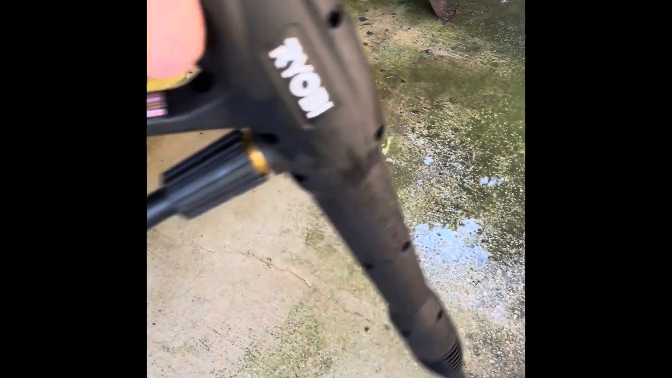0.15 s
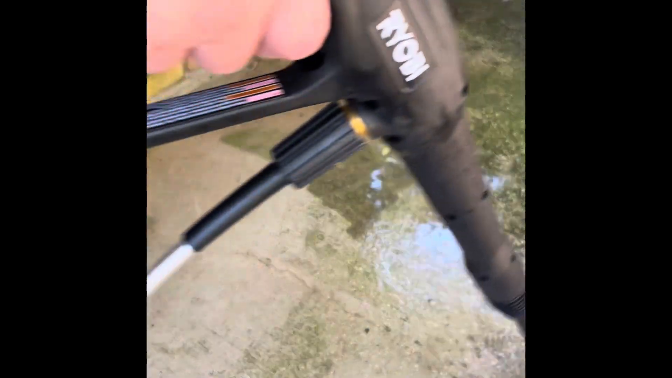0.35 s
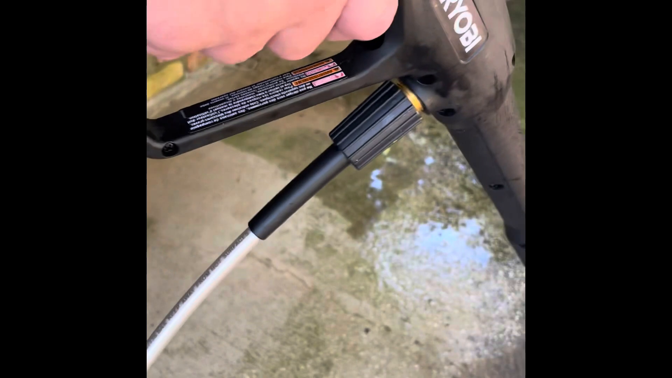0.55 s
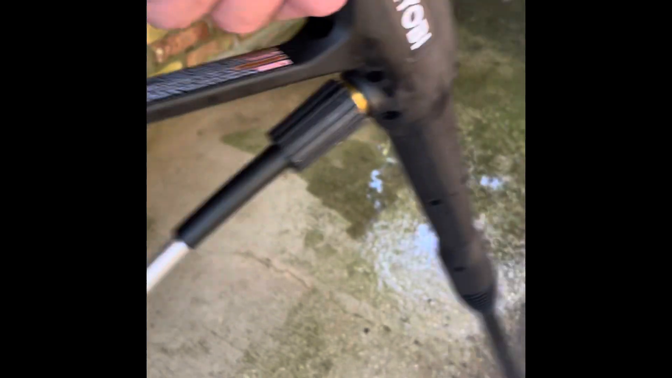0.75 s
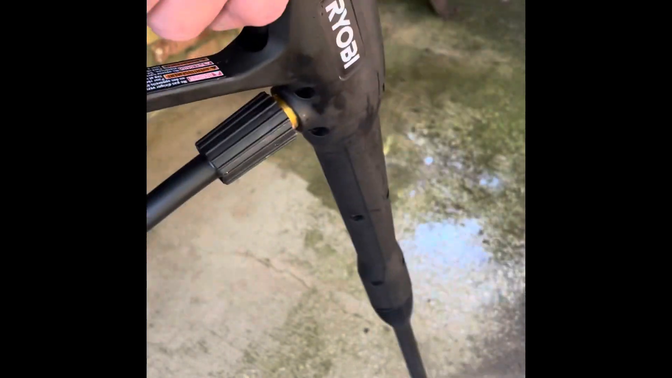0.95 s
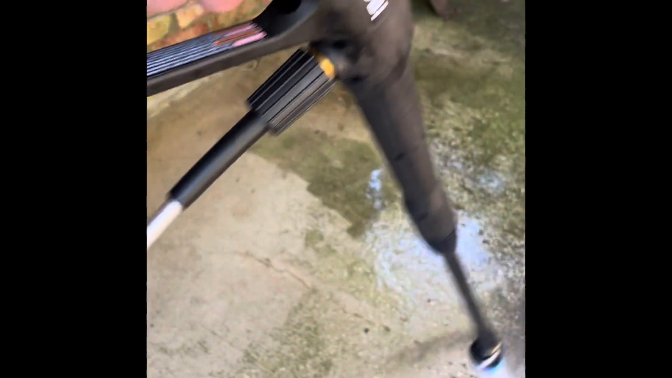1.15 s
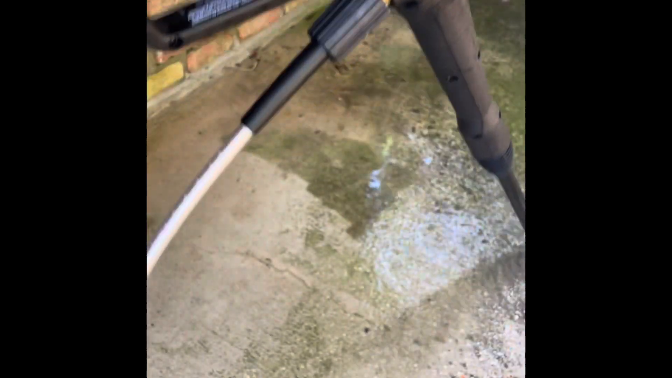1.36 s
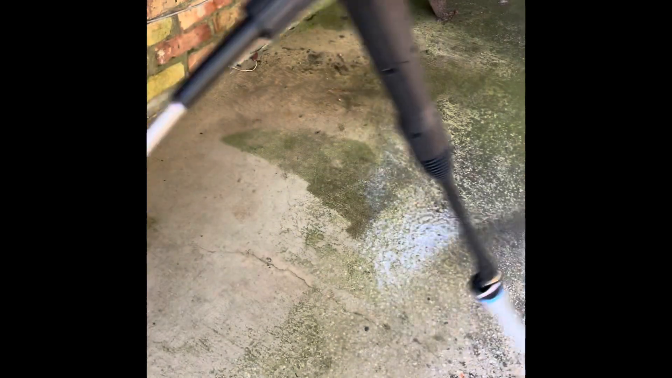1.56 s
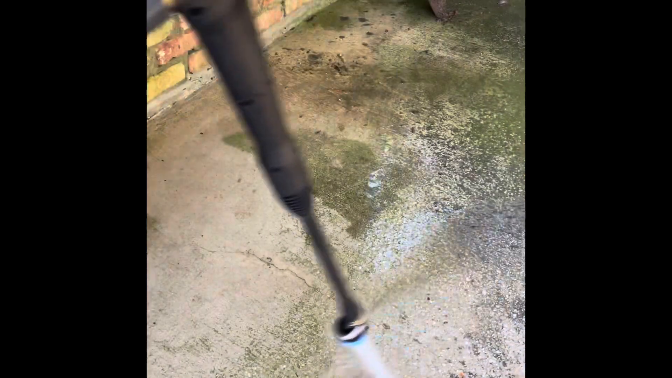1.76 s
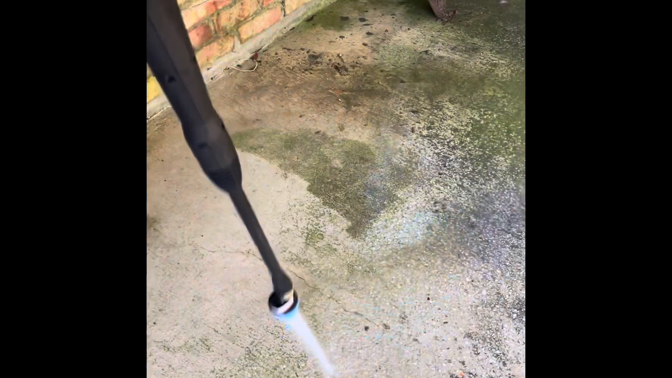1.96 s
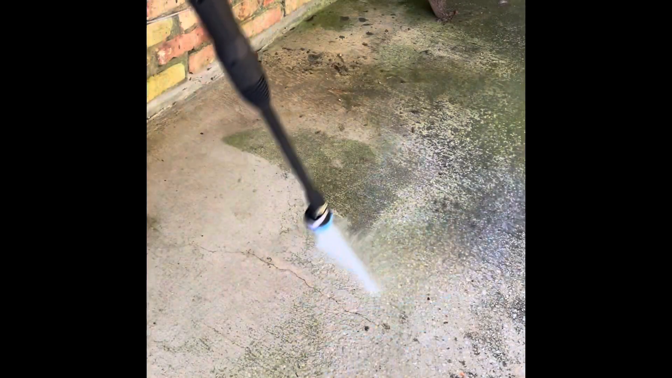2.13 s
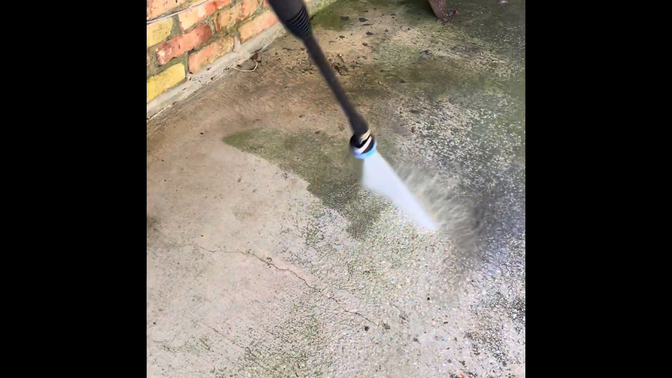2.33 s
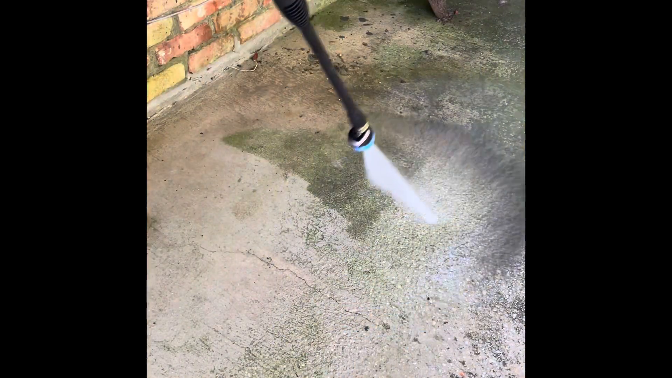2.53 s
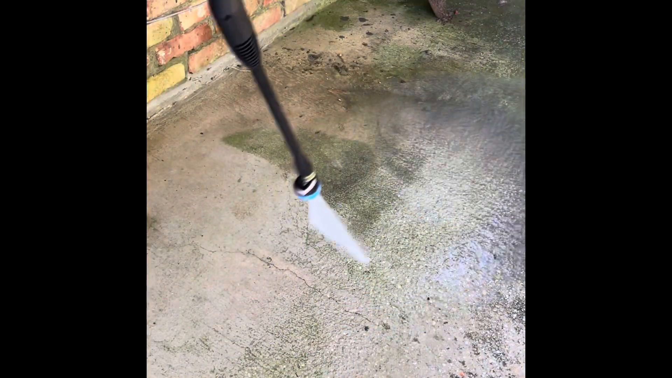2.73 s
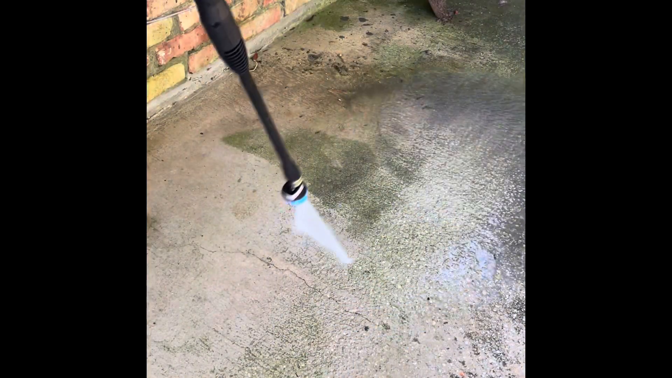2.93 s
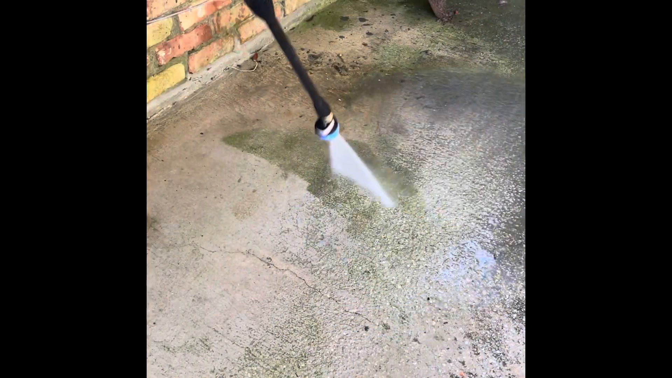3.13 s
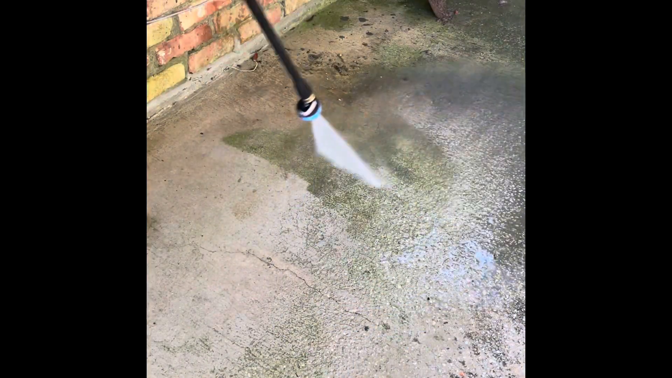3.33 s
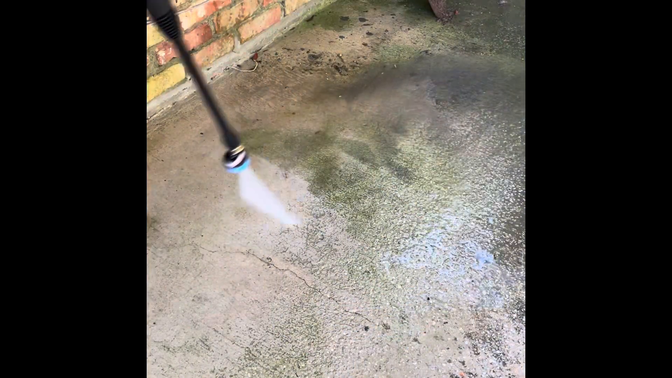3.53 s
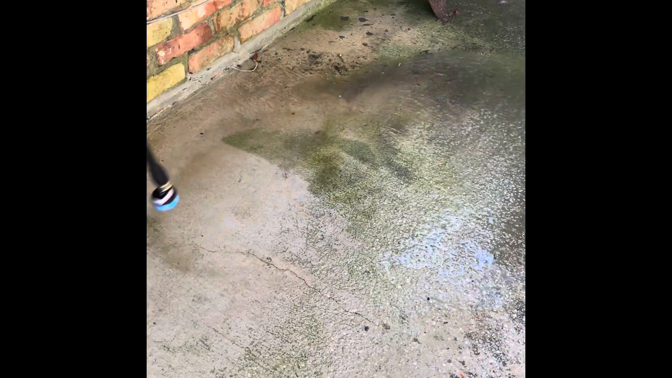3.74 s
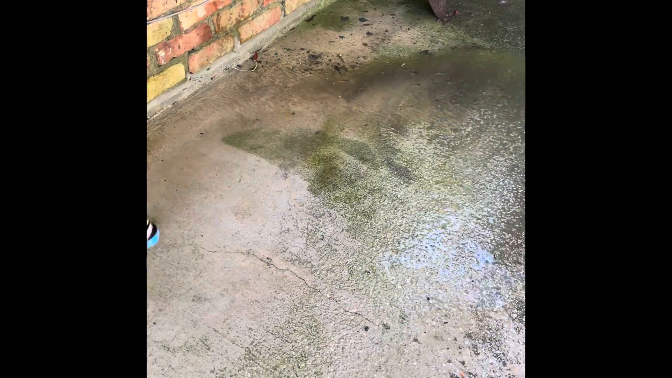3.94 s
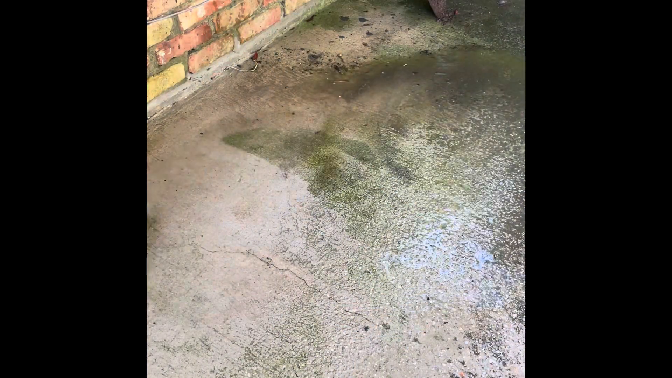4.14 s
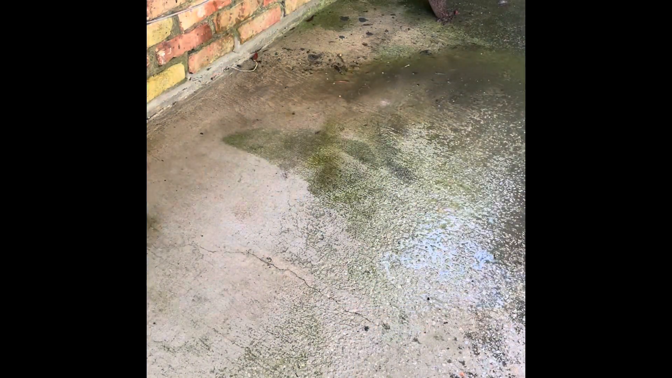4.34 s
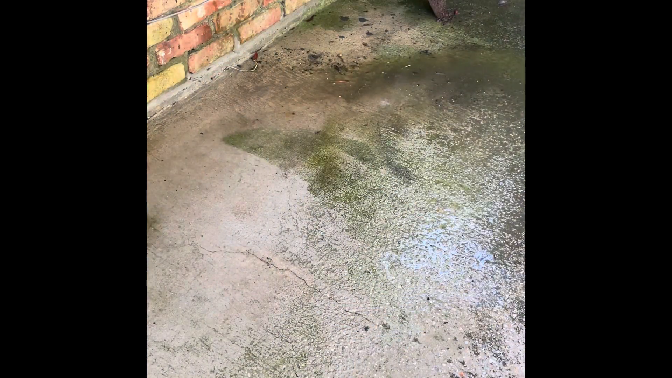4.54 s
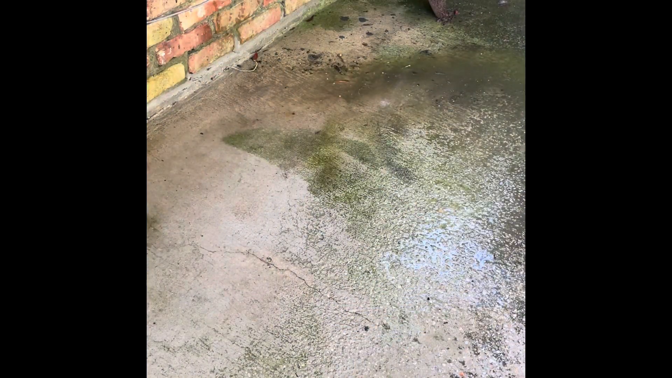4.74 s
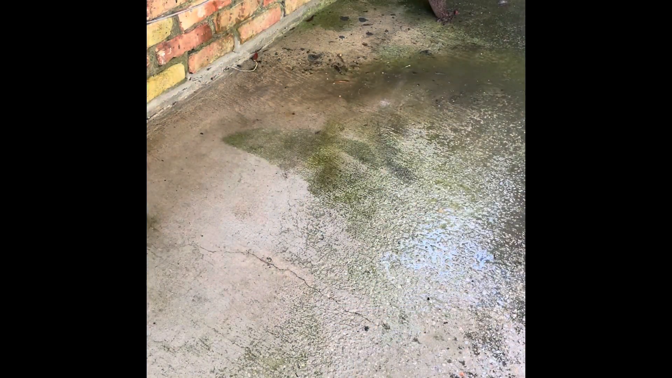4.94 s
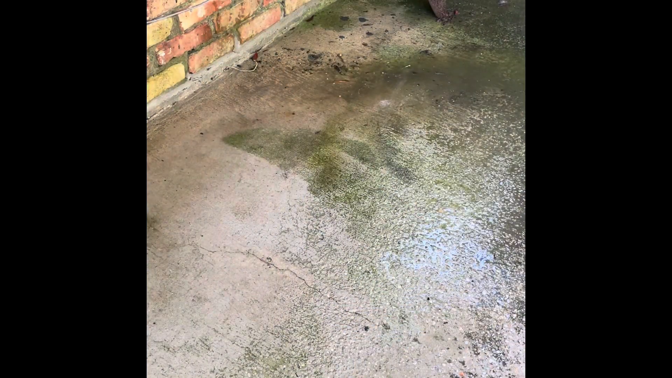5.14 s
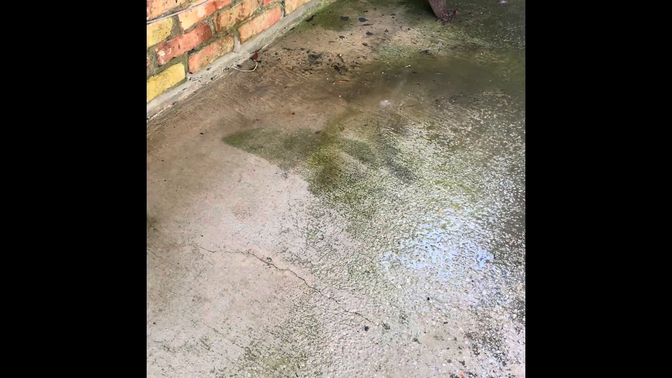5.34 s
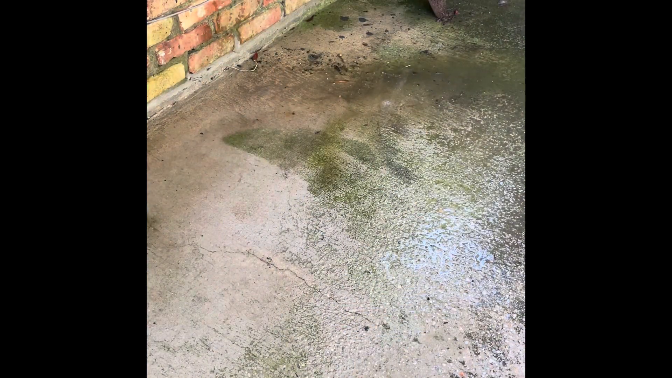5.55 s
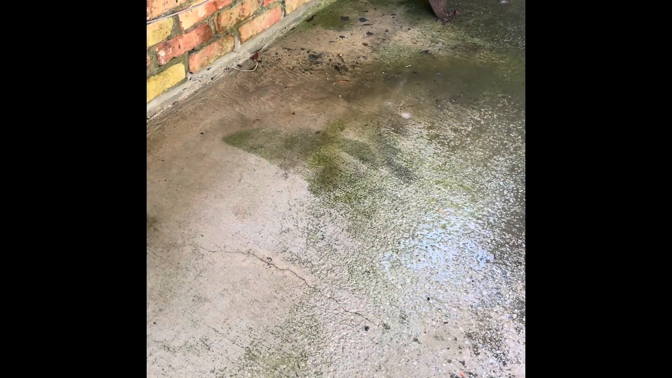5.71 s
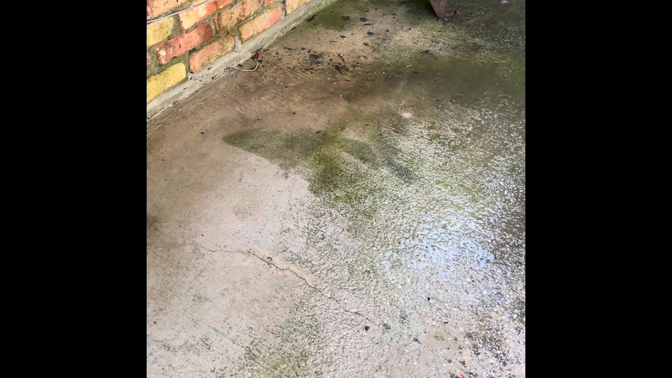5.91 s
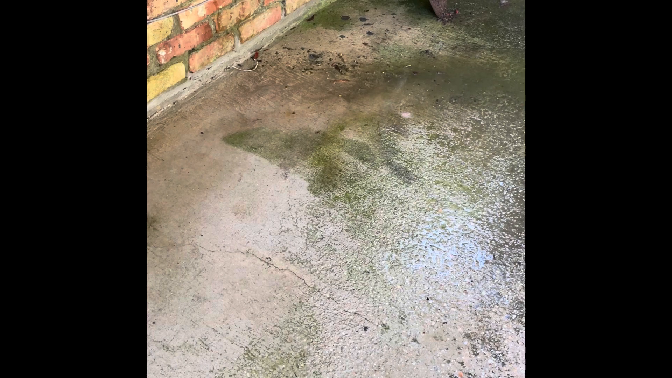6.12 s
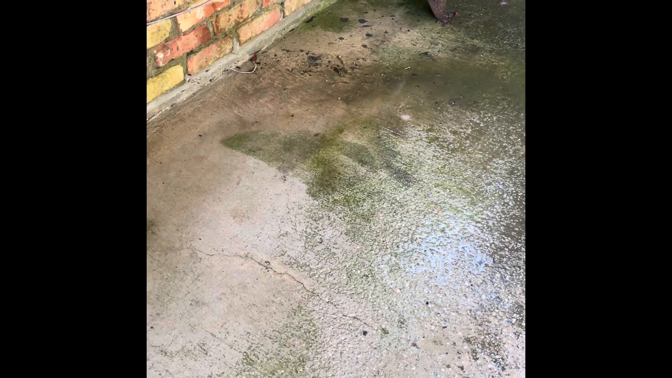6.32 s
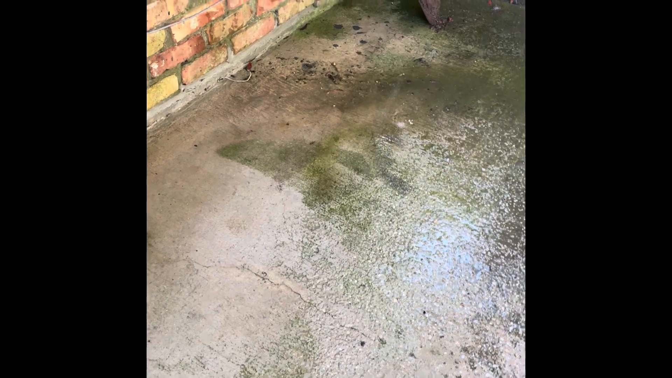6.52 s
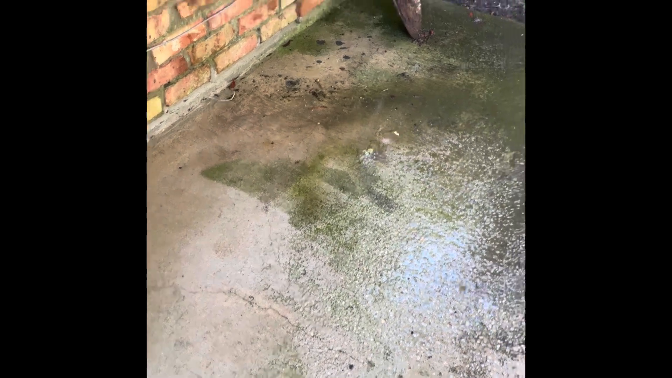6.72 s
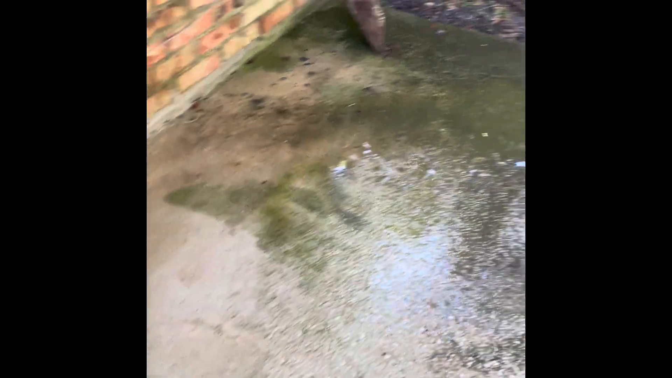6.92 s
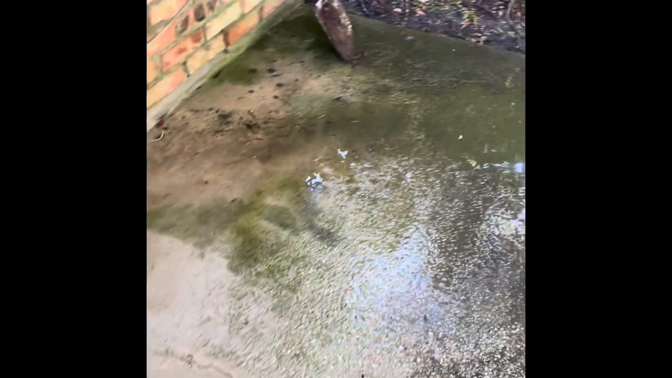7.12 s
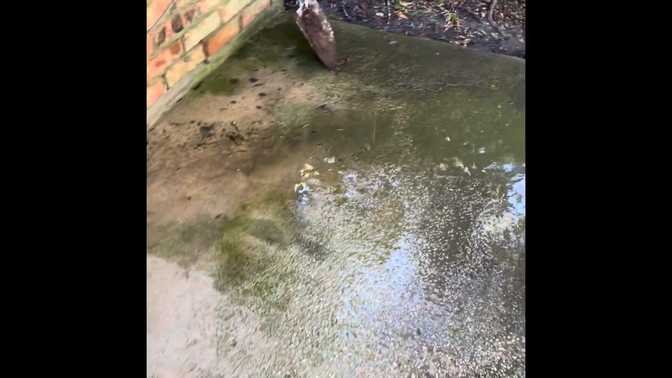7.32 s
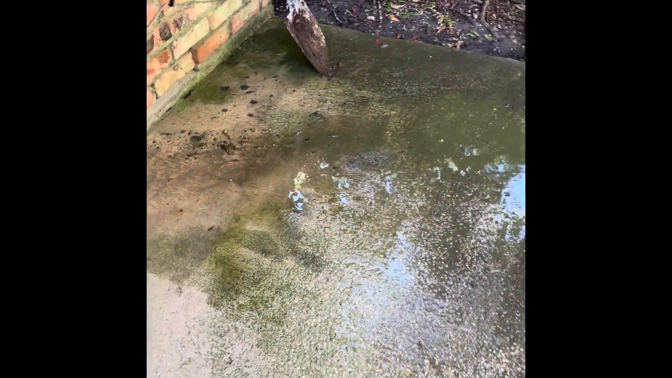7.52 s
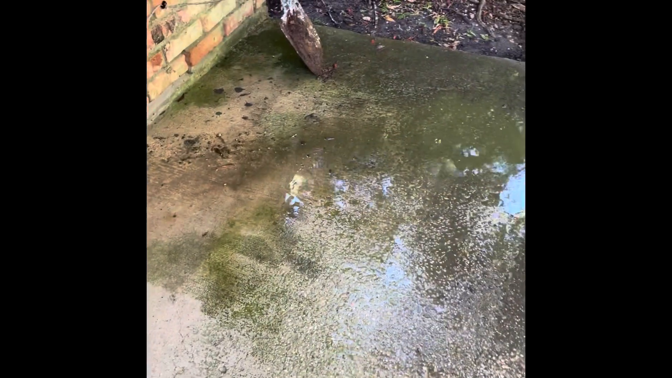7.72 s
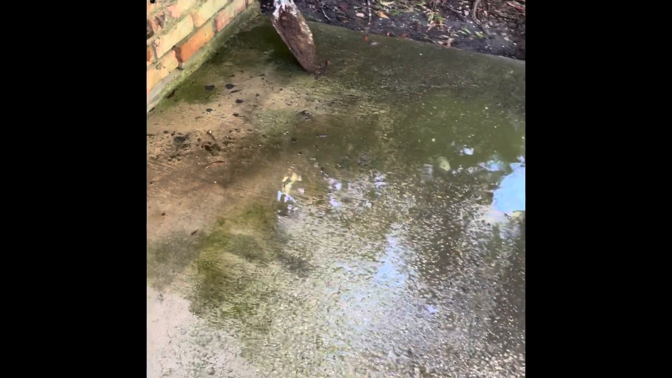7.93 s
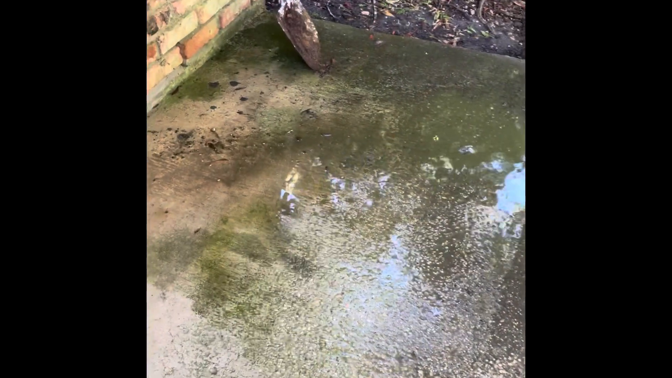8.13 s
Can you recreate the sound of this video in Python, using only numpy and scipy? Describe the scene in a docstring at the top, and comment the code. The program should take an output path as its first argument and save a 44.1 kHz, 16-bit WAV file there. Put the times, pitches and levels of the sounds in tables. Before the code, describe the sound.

Steady water hiss and a rough electric motor whirr fill the opening, with one hollow knock on the spray gun. The water shuts abruptly; the whine falls unevenly through plastic housing resonances and ends with a short catch and dry scrape. Afterwards a quiet yard holds faint traffic rumble, air and barely audible insects, with small shoe crunches and hollow hose rattles. Wide stereo pickup outdoors, close to the handling, with short wall reflections.

```python
"""An electric pressure washer on a concrete yard: a brush motor drives a piston pump through a small gear.
Sines locked to one motor speed make hum, pump and gear whine; shaped noise makes whirr and jet hiss.
The jet shuts off, the motor coasts down through the housing's resonances and the pump scrapes to rest.
Far traffic, still air and insects lie beneath, as noise bands; a hollow bonk, hose knocks and shoe scuffs
are short bursts through resonances. The left-right phase changes with frequency."""
import sys
import numpy as np
from scipy import signal
from scipy.fft import rfft, irfft, next_fast_len
from scipy.io import wavfile
from scipy.ndimage import uniform_filter1d, map_coordinates

SR = 44100
rng = np.random.default_rng(int(sys.argv[2]) if len(sys.argv) > 2 else 0)


def output_pcm(signal):
    """Save a mono or channel-first signal as 16-bit PCM at the path in sys.argv[1].

    Samples are clipped to [-1, 1] before scaling.
    """
    pcm = np.clip(np.atleast_2d(signal).T, -1, 1) * 32767
    wavfile.write(sys.argv[1], SR, np.round(pcm).astype(np.int16))


N = 364707
T = np.arange(N) / SR  # time in seconds

CLOSE_S = 3.63  # the trigger valve shuts
MESH_HZ = 3677  # gear tooth rate at full speed
FLARE_DB = 2  # scale of the uneven flaring of the coasting hum and whine
# Spectrum of the pump's scrape and clunk. Each row: frequency in Hz, relative level in dB per Hz.
SCRAPE_SPECTRUM = [(290, -59.5), (500, -17), (705, -10), (1180, -12.5), (1500, -13), (2000, -15.5),
                   (2600, -16.5), (3000, -20), (5590, -26), (6500, -33), (8450, -73.5), (14300, -120)]


def amp(db):
    """Gain of a level in dB."""
    return 10 ** (np.asarray(db) / 20)


def unit(x):
    """x at rms 1."""
    return x / np.sqrt(np.mean(x ** 2) + 1e-20)


def along(points, hz):
    """Values at hz, drawn through (Hz, value) points on a log axis."""
    f, v = np.transpose(points)
    return np.interp(np.log(hz + 1), np.log(f + 1), v)


def curves(rows):
    """One value per sample for each column after the time."""
    s, *cols = np.transpose(rows)
    return [np.interp(T, s, c) for c in cols]


def wobble(rate):
    """A smooth random curve, rate knots a second."""
    knots = rng.standard_normal(int(N * rate / SR) + 4)
    return map_coordinates(knots, [T * rate])


def filtered(x, response):
    """x times a complex response of frequency."""
    m = next_fast_len(N + SR // 4)
    return irfft(rfft(x, m) * response(np.fft.rfftfreq(m, 1 / SR)), m)[..., :N]


def body(modes):
    """Causal response of (Hz, width Hz, dB) resonances with alternating sign."""
    return lambda f: sum((-1) ** k * amp(db) * 1j * f * w / (c * c - f * f + 1j * f * w)
                         for k, (c, w, db) in enumerate(modes))


def rush(spectrum, patchy_db):
    """Two unrelated noises of joint rms 1, sharing patches of random gain in time and frequency."""
    z = signal.stft(rng.standard_normal((2, N)), nperseg=512)[2]
    field = uniform_filter1d(rng.standard_normal(z.shape[1:]), size=6, axis=0)
    field = uniform_filter1d(field, size=10, axis=1)
    pair = signal.istft(z * amp(patchy_db * unit(field)), nperseg=512)[1][:, :N]
    lowest, highest = spectrum[0][0], spectrum[-1][0]
    return unit(filtered(pair, lambda hz: amp(along(spectrum, hz)) * (hz > lowest) * (hz < highest)))


def orders(turns, table, waver_db, rate):
    """Sines on multiples of a rotation, each wavering in level on its own."""
    return sum(np.sqrt(2) * amp(db + waver_db * wobble(rate))
               * np.sin(2 * np.pi * (round(k) * turns + rng.random())) for k, db in table)


def burst(s, db, rise, t60):
    """Envelope of one contact: a quick exponential rise under a decay of 60 dB per t60."""
    t = np.clip(T - s, 0, 1)
    return amp(db - 60 * t / t60) * (1 - np.exp(-t / rise))


def scattered(x, t60, share=1, lean=0):
    """The direct sound and, for the side, a share scattered by the walls plus its lean to the left."""
    t = T[:SR // 8]
    tail = rng.standard_normal(len(t)) * amp(-60 * t / t60)
    echo = signal.fftconvolve(x, tail / np.linalg.norm(tail))[:N]
    return np.array([x, lean * x + share * echo])


def drive():
    """The pump load holds the motor down; once power is cut, trapped pressure and then friction brake it."""
    cut_s = 3.764
    trapped_hz, trapped_s = 453, .085  # mesh rate lost to the trapped pressure, and its bleeding time
    drag_hz_per_s, drag_s = 2717, 2.74  # friction's first braking, and its easing time
    surge_s = 0.19  # the pressure surges this long behind the shut valve
    stall = 0.032  # share of full speed around which the motor's sounds die away
    coasting = uniform_filter1d(np.clip(T - cut_s, 0, None), size=SR // 9)  # the drive fades, not snaps
    load = np.exp(-coasting / trapped_s)
    lost_hz = trapped_hz * (1 - load) + drag_hz_per_s * drag_s * (1 - np.exp(-coasting / drag_s))
    speed = np.clip(1 - lost_hz / MESH_HZ, 1e-3, 1)
    turning = 1 / (1 + (stall / speed) ** 4)
    flowing = np.clip(1 - (T - CLOSE_S) / surge_s, 0, 1)
    mesh = np.cumsum(MESH_HZ * speed * (1 + 0.00043 * wobble(12))) / SR  # teeth passed so far
    return speed, load, turning, flowing, mesh


def shaft_hum(speed, load, mesh):
    """The motor shaft hums through a frame that radiates each speed differently."""
    # What the frame radiates of the shaft hum. Each row: shaft rate in Hz, level in dB.
    frame = [(20, -82), (100, -61), (180, -51.5), (218, -55), (230, -37), (245, -37), (275, -42.5),
             (305, -42.5), (318, -36.5), (334, -33)]
    # Tones of the motor shaft. Each row: multiple of the shaft rate, level in dB over the hum.
    shaft = [(1, 0), (2, -19.5), (3, -23.5)]
    teeth = 11  # on the motor's pinion
    level_db = along(frame, MESH_HZ * speed / teeth) + FLARE_DB * (1 - load) * wobble(30)
    return amp(level_db) * orders(mesh / teeth, shaft, waver_db=0.5, rate=23)


def pump_strokes(speed_db, load, flowing, mesh):
    """The pistons throb on multiples of the pump shaft, with slack once unloaded."""
    # Tones of the pump. Each row: multiple of the pump shaft rate, level in dB over the pump.
    strokes = [(3, -0.5), (6, -2), (7, -3), (8, 4), (10, 3), (12, -2), (13, -1.5), (16, -7), (20, -0.5),
               (22, -5.5), (24, -2.5), (28, -2.5), (30, -15), (34, -7.5), (38, -3.5), (42, -3.5),
               (104, 0.5), (106, -1), (194, -4), (202, -2.5)]
    wheel = 100  # teeth on the pump's gear wheel
    slack_turns = .012  # scale of the unloaded jitter
    level_db = -53 + 4 * flowing + speed_db  # louder while water flows, sinking dB for dB with speed
    turns = mesh / wheel + slack_turns * (1 - load) * wobble(70)
    return amp(level_db) * orders(turns, strokes, waver_db=3.0, rate=8)


def gear_whine(speed, speed_db, load, turning, flowing, mesh):
    """Meshing teeth whine; jitter within their play smears the pitch, more when unloaded or slow."""
    # The whine over time. Each row: time in seconds, first mesh order in dB over the whine,
    # lean to the left, gain of the second order in dB.
    first = [(0.1, -7, -1, 5), (0.8, -6, -1.4, 5), (1.4, -6.5, -1.3, 4), (1.8, -7, -.9, 1),
             (2.3, -5, -1.2, 4), (2.7, -4.5, 2.4, 5), (3.6, -4.5, 2.4, 5), (3.75, 1, .4, 5),
             (3.84, -2, .4, 6), (3.92, -6, .3, 3), (3.99, -5, .3, -1), (4.08, -7, .4, 2), (4.13, -2, .4, 3),
             (4.36, -4, .3, 1), (4.45, -8, .4, 0), (4.6, -13, .4, -1), (4.67, -5, .4, 2), (4.73, -5, .3, 0),
             (4.8, -8, .3, -1), (4.92, -5, .2, 3), (4.97, -3, .2, 6), (5.02, -4, .2, 8), (5.07, -22, 0, 11),
             (5.13, -22, 0, 11), (5.19, -22, 0, 6)]
    # Mesh overtones from the second order up. Each row: multiple of the mesh rate, level in dB.
    gear = [(2, -5), (3, -6.5), (4, -4.5), (5, -9.5), (6, -8), (7, -12.5), (8, -9)]
    # The late whine in the side once the water stops. Each row: frequency in Hz, share of the whine.
    coasting_lag = [(600, -.7), (1300, -1.3), (1700, .5), (2600, .5), (3200, 0)]
    flowing_lag = 2  # the same share while water flows
    wall_echo = .55  # share of the coasting whine returned by the walls
    play = .03 + .065 * (1 - load) + .005 / speed  # scale of the jitter in turns
    teeth = mesh + play * (.8 * wobble(260) + .9 * wobble(80))
    first_db, lean, second_db = curves(first)
    tones = orders(teeth, [(1, 0)], waver_db=2.2, rate=16) * amp(first_db)
    second, higher = (orders(teeth, part, waver_db=2.5, rate=90) for part in (gear[:1], gear[1:]))
    overtones_db = 10.5 - 13 * load + 1.25 * speed_db
    tones = tones + amp(overtones_db) * (amp(second_db) * second + higher)
    level_db = -42 + 2 * load - .08 * speed_db + FLARE_DB * (1 - load) * wobble(45)
    tones = tones * turning * amp(level_db)
    # the small gear case radiates no bass
    whine = filtered(tones, lambda f: 1 / (1 + (560 / (f + 1)) ** 8))
    whine = whine + wall_echo * scattered(whine * (1 - load), t60=.25)[1]
    # a copy a quarter cycle late joins the side only
    parts = np.array([flowing_lag * flowing, 1 - flowing]) * whine
    late = filtered(parts, lambda f: -1j * np.array([f >= 0, along(coasting_lag, f)])).sum(0)
    return scattered(whine, t60=0.33, share=0.42, lean=lean) + late * [[0], [1]]


def brush_whirr(speed_db, turning, flowing, mesh):
    """Brush and gear noise swells once per tooth; its low growl fades more slowly with speed."""
    growl_hz = 1210
    slowest_db = -18  # speed below which the upper whirr fades no further
    whirr = (1 + 0.35 * np.cos(2 * np.pi * mesh)) * rng.standard_normal((2, N))
    whirr = whirr * turning * amp(-31 - 0.5 * flowing)  # quieter while water flows
    growl = filtered(whirr, lambda f: 1 / (1 + (f / growl_hz) ** 4))
    upper = (whirr - growl) * amp(np.maximum(speed_db, slowest_db))
    return upper + growl * amp(-8.5 + 0.61 * speed_db)


def motor():
    """Every machine sound follows one speed; gear whine and brush whirr ring the plastic housing."""
    # Resonances of the housing. Each row: frequency in Hz, width in Hz, gain in dB.
    housing = [(247, 69, 10.5), (341, 55, 17), (567, 110, 5), (709, 43, 13.5), (875, 56, 10.5),
               (1004, 110, 4.5), (1900, 1340, 1.5), (2730, 1360, 1.5), (3758, 590, 3), (4135, 260, 6),
               (5190, 420, 3.5), (5920, 240, 5), (6860, 600, -0.5)]
    case_top_hz = 12000  # the plastic shell damps what lies above
    speed, load, turning, flowing, mesh = drive()
    speed_db = 20 * np.log10(speed)
    low = shaft_hum(speed, load, mesh) + pump_strokes(speed_db, load, flowing, mesh)
    inside = gear_whine(speed, speed_db, load, turning, flowing, mesh)
    inside = inside + brush_whirr(speed_db, turning, flowing, mesh)
    cased = filtered(inside, lambda f: body(housing)(f) / (1 + (f / case_top_hz) ** 6))
    return scattered(turning * low, t60=.06, share=.25, lean=.25) + cased


def jet():
    """The fan of water tears on the concrete as broad noise until the trigger closes."""
    # Loudness of the jet. Each row: time in seconds, level in dB before the valve shuts it off.
    strength = [(0.15, -26), (0.6, -26), (2.0, -26), (2.45, -27.5), (3.55, -26.5)]
    # Spectrum of the hiss. Each row: frequency in Hz, relative level in dB per Hz.
    hiss = [(60, -33.5), (150, -2.5), (350, -1.5), (700, -2.5), (1200, -2.5), (2200, -2.5), (3500, -0.5),
            (4500, 0), (6000, 1), (7500, 1), (10000, -1), (12500, -5), (14500, -6), (15700, 3)]
    close_db_per_s = 324
    level_db = curves(strength)[0] - close_db_per_s * np.clip(T - CLOSE_S, 0, 1)
    return amp(level_db + 0.071 * wobble(15)) * rush(hiss, patchy_db=1.5)


def engine_drone(hz, width):
    """A fuzzy engine tone: noise in a narrow bell of frequencies, at rms 1."""
    noise = rng.standard_normal((2, N))
    return unit(filtered(noise, lambda f: np.exp(-((f - hz) / width) ** 2)))


def traffic():
    """Far traffic: a wide low rumble with two engine drones in it."""
    # Loudness over time. Each row: time in seconds, rumble, low drone and high drone level in dB.
    levels = [(0, -50.5, -52.5, -67.5), (2.6, -49, -51.5, -64), (3.2, -48.5, -79, -54.5),
              (4.4, -50, -55.5, -59), (5.3, -46.5, -50, -63), (6.3, -43.5, -47, -57.5),
              (6.95, -46.5, -48, -55), (7.25, -45, -65, -45.5), (8.27, -44.5, -67, -45)]
    # Spectrum of the rumble. Each row: frequency in Hz, relative level in dB per Hz.
    rumble = [(15, -71), (30, -18), (45, -12), (98, -6), (147, -7.5), (177, -7.5), (209, -17), (270, -20),
              (385, -25), (499, -27.5), (632, -29.5), (839, -28.5), (1110, -39), (1900, -49), (2300, -58),
              (7000, -82.5), (9100, -112), (15400, -120)]
    rumble_db, low_db, high_db = curves(levels)
    engines = amp(low_db) * engine_drone(hz=104.8, width=4)
    engines = engines + amp(high_db) * engine_drone(hz=179.8, width=2.2)
    return amp(rumble_db + 1.5 * wobble(3.05)) * rush(rumble, patchy_db=0.5) + engines


def still_air():
    """A very faint steady hush of treble noise."""
    # Spectrum of the hush. Each row: frequency in Hz, relative level in dB per Hz.
    air = [(2500, -23), (4000, 1), (8000, -1), (10500, -5.5), (13000, -3.5), (15700, -13.5)]
    return amp(-87.5) * rush(air, patchy_db=3.5)


def insects():
    """Insects chirr as a narrow, flickering band of high noise."""
    # Spectrum of the chirr. Each row: frequency in Hz, relative level in dB per Hz.
    chirr = [(8200, -32.5), (8600, -15), (9200, -3), (9400, -2), (9600, -15), (9800, -33.5)]
    return amp(-79.5 + 2.5 * wobble(30)) * rush(chirr, patchy_db=2.5)


def bonk():
    """The gun's hollow modes swell one by one, the lowest last; each is a sine with jittered phase."""
    # Modes of the gun. Each row: frequency in Hz, level in dB, time to fall 60 dB in seconds,
    # start in seconds, rise time in seconds.
    gun = [(75, -30, .15, .66, .01), (214, -12, .23, .646, .025), (443, -6, .14, .642, .02),
           (600, -19, .1, .642, .01), (688, -19, .15, .643, .015), (860, -4, .13, .634, .05),
           (1037, -18, .11, .646, .015)]
    ring = sum(burst(s, db, rise, t60) * np.sin(2 * np.pi * (hz * T + 0.097 * wobble(110)))
               for hz, db, t60, s, rise in gun)
    return scattered(ring, t60=.04, share=.4)


def hose():
    """Each bump is a blow and a short rattle, ringing four groups of modes of the hollow hose."""
    # Bumps of the hose. Each row: time in seconds, blow on the upper modes in dB, then the blow on the
    # top, middle and low modes in dB over that.
    knocks = [(3.752, -11, 1, -1, 0), (5.604, -36, 19, -7, -6), (5.619, -27.5, 15, -8, -3.5),
              (5.64, -31, 17, -5, -6), (5.657, -31.5, 12, -5, -3.5), (5.68, -31, 13, -3, -5),
              (5.705, -37, 6, -7, -3), (5.949, -29, -2, -4, -1), (5.99, -29.5, 7, 1, 2),
              (6.039, -20.5, 3, -3, -8.5), (6.053, -22, 3, -1, -3.5), (6.069, -24, -1, 4, -2.5),
              (6.091, -26, 1, 9, -0.5), (6.113, -24.5, 2, 1, -8), (6.301, -20, 2, -4, -7.5),
              (6.31, -20, -4, -6, -8.5), (6.334, -23, 2, 3, 0), (6.346, -16, 5, 12, 5),
              (6.358, -21.5, 5, 10, 2.5), (6.38, -24, -2, 11, 3), (6.402, -27, -6, 6, 1),
              (6.43, -35, -1, 15, 0), (7.816, 0, -5, -6, -19), (7.836, -3, -6, 0.5, -17),
              (7.851, -0.5, 0, 0, -6), (7.864, -5.5, -11, 0, 4.5), (7.884, -15.5, 2, 5, 8),
              (7.911, -4.5, -9, -15, -8), (8.026, -26, 4, 1, 0.5)]
    # Upper, top, middle and low group of modes. Each row in a group: frequency in Hz, width in Hz,
    # gain in dB.
    tube = [
        [(723, 36, 0), (777, 43, 1.5)],
        [(853, 34, 0.5), (930, 22, -7)],
        [(460, 27, -5), (548, 29, 2)],
        [(76.5, 11, 0.5), (186, 37, -5), (286, 87, -5.5)],
    ]
    rattle_share, rattle_t60 = .4, 0.047  # the latter in seconds
    hose_top_hz = 1150  # the rubber dulls what lies above

    def ring(modes):
        """Response of one group behind the rubber's steep treble loss."""
        return lambda f: (sum(body([mode])(f) for mode in modes)
                          / (1 - (f / hose_top_hz) ** 2 + 1j * f / hose_top_hz) ** 3)

    force = np.zeros((4, N))
    grit = rng.standard_normal(N)
    for s, blow_db, *over_db in knocks:
        blow = burst(s, blow_db, 0.00049, .006)
        rattle = rattle_share * burst(s, blow_db, 0.0014, rattle_t60) * grit
        # top and middle groups swing against upper and low
        force += amp([0, *over_db])[:, None] * [[1], [-1], [-1], [1]] * (blow + rattle)
    sound = sum(filtered(push, ring(modes)) for push, modes in zip(force, tube))
    return scattered(sound, t60=0.035, share=0.62, lean=-.3)


def clunk():
    """The pistons catch: one burst of scrape noise, partly through two resonances."""
    # Resonances of the catch. Each row: frequency in Hz, width in Hz, gain in dB.
    clunk_ring = [(1500, 400, 2), (2300, 400, 1)]
    hit = burst(5.197, -36.5, rise=0.0012, t60=.07) * rush(SCRAPE_SPECTRUM, patchy_db=1)
    return 0.56 * hit + filtered(hit, body(clunk_ring))


def scrape():
    """The pump drags to rest in uneven slips of noise whose resonance climbs."""
    # Strength of the drag. Each row: time in seconds, level in dB ahead of the resonance.
    drag = [(5.215, -55), (5.245, -46), (5.325, -43.5), (5.36, -53.5), (5.44, -75.5)]
    # The resonance climbs from the first row to the second. Each row: frequency in Hz, width in Hz,
    # gain in dB.
    squeak = [(1450, 300, 5), (1830, 300, 5.5)]
    level_db = curves([(5.15, -99)] + drag + [(5.52, -99)])[0]
    slips = amp(level_db + 1.8 * wobble(260)) * rush(SCRAPE_SPECTRUM, patchy_db=-0.5)
    climb = np.interp(T, [5.26, 5.3], [0, 1])
    low, high = (filtered(slips, body([mode])) for mode in squeak)
    return 0.7 * slips + (1 - climb) * low + climb * high


def shoes():
    """Shoes scuff on grit, which crunches in uneven grains of noise, each scuff with its own colour."""
    # Scuffs. Each row: time in seconds, level in dB ahead of the bands, tilt in dB per band from
    # bright to dull.
    scuffs = [(5.488, -71, 2), (5.539, -78.5, 13), (5.61, -74, -2.5), (5.66, -66, 0), (5.719, -68, 4),
              (6.05, -74.5, 4.5), (6.082, -71.5, 9), (6.273, -56.5, -14), (6.284, -62.5, -9.5),
              (6.312, -66, -1.5), (6.339, -65, 7.5), (7.088, -61, -0.5), (7.11, -73, -1.5),
              (7.36, -69.5, -1), (7.374, -54, -1), (7.391, -59, -2), (7.436, -69, -2.5),
              (7.465, -71.5, 4.5), (7.817, -72, 15), (7.832, -65, 7), (7.847, -53, 14), (7.862, -62, 1.5),
              (7.875, -62, 1.5), (7.906, -66.5, 7)]
    # Bright, middle and dull crunch, each band passed twice. Each row: frequency in Hz, width in Hz,
    # gain in dB per pass.
    crunch = [(10900, 11000, -4), (4500, 3500, 0.5), (2100, 1600, 1)]
    force = sum(amp([[-tilt_db], [0], [tilt_db]]) * burst(s, db, rise=0.002, t60=0.14)
                for s, db, tilt_db in scuffs)
    grains = rng.standard_normal((3, 2, N)) * amp(3.2 * wobble(500))
    return sum(filtered(push * grain, lambda f: body([band])(f) ** 2)
               for push, grain, band in zip(force, grains, crunch))


def scene():
    """Direct and scattered sound mix into left and right; the machine stands a little to the left."""
    # Likeness of the two sides. Each row: frequency in Hz, left-right likeness (1 is identical).
    alike = [(60, 1), (170, 1), (350, 0.88), (520, 0.57), (800, 0.39), (1400, 0.4), (2000, 0.46),
             (2500, 0.49), (3500, 0.21), (4500, 0.32), (5000, .94), (5500, 0.55), (6300, 0.27), (7000, 1),
             (8200, 1), (9100, 0.39), (9800, 0.98), (10400, 0.89), (11700, 0.65), (12500, .6),
             (13200, 0.92), (15000, 1), (15600, .7)]
    pair = motor() + jet() + traffic() + still_air() + insects()
    pair = pair + bonk() + hose() + clunk() + scrape() + shoes()
    turn = lambda hz: np.arccos(np.clip(along(alike, hz), -1, 1)) / 2
    mid, side = filtered(pair, lambda hz: np.array([np.cos(turn(hz)), np.sin(turn(hz))]))
    # (Hz, dB added on the left and taken off the right), none from 4500 Hz up
    left_db = [(150, 0.071), (350, 0.35), (1500, 0.48), (2000, 0.5), (3000, 0.52), (4500, 0)]
    lean = lambda hz: amp(along(left_db, hz) * (hz < 4500) * [[1], [-1]])
    return filtered(np.array([mid + side, mid - side]), lean)


def record(dry):
    """Left-right phase shifts with frequency; a double-speed instant fades, then normal speed fades in."""
    # Left-right phase, changing with frequency. Each row: frequency in Hz, half turns by which the
    # right channel lags.
    phase = [(0, .0), (450, .0), (780, .28), (1120, .05), (1460, .15), (1900, .0), (2900, .25), (4000, .3),
             (5100, .01), (5500, .1), (6000, .45), (6600, .72), (6950, 1), (8250, 1), (9100, 1.4),
             (9700, 1.66), (10350, 2), (11750, 2), (12700, 2.55), (13150, 2 + 1), (15050, 2 + 1),
             (15500, 3.25)]
    top_hz = 15770  # nothing passes above
    f, half_turns = np.transpose(phase)
    # half of the lag advances the left, half delays the right
    x = filtered(dry, lambda hz: np.exp(.5j * np.pi * np.interp(hz, f, half_turns) * [[1], [-1]]))
    # every other sample, from one second in
    fast = filtered(x, lambda hz: hz < SR / 4)[:, SR::2]
    fast = np.pad(fast, ((0, 0), (0, N - fast.shape[1])))
    opening = fast * amp(0.5) * np.interp(T, [.048, .083], [1, 0])
    x = opening + x * np.interp(T, [.08, .118], [0, 1])
    return filtered(x, lambda hz: hz < top_hz)


dry = scene()
out = record(dry)
output_pcm(out)
```